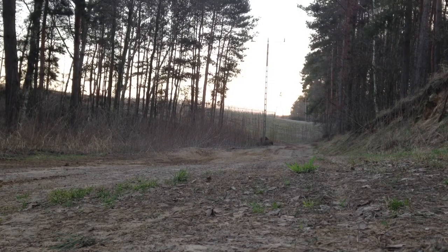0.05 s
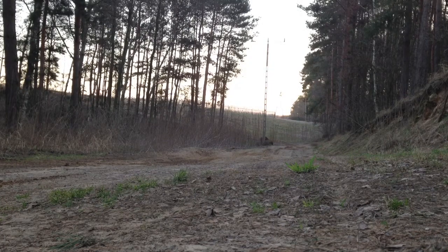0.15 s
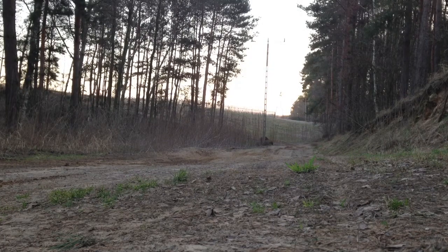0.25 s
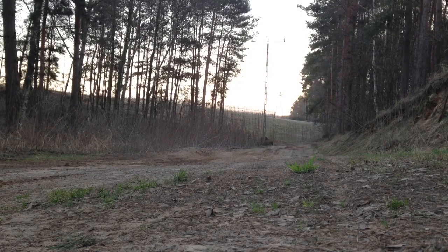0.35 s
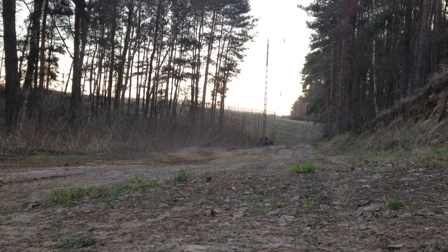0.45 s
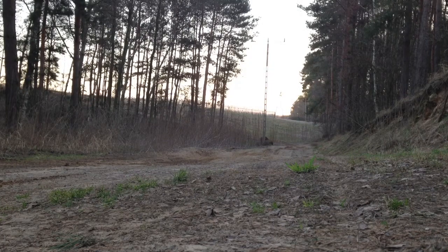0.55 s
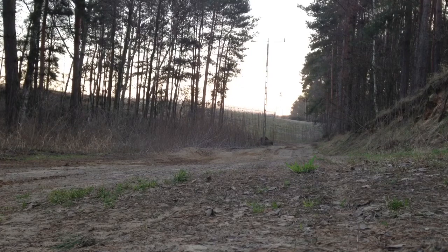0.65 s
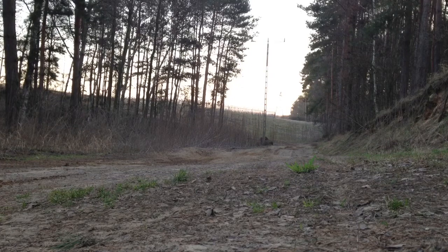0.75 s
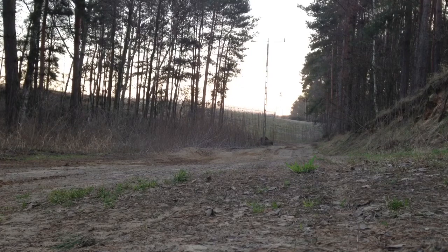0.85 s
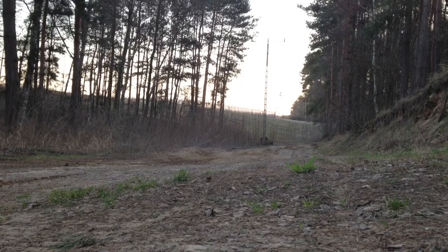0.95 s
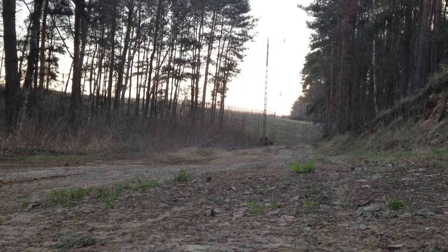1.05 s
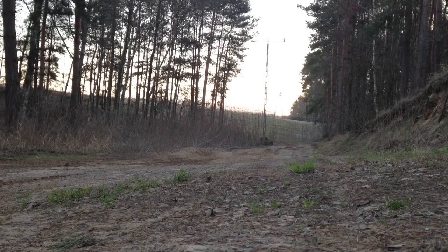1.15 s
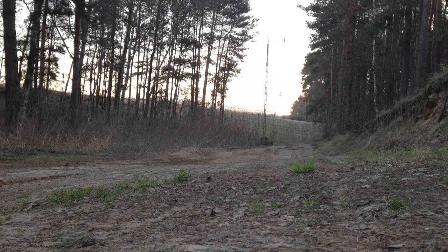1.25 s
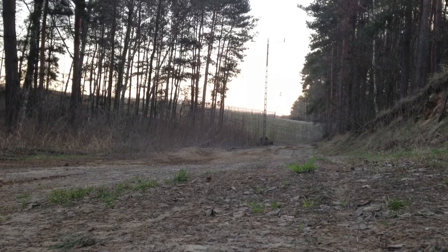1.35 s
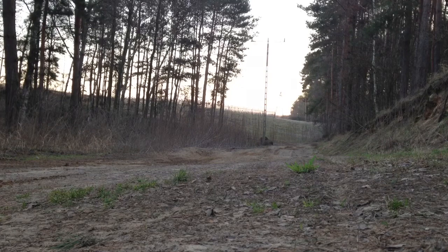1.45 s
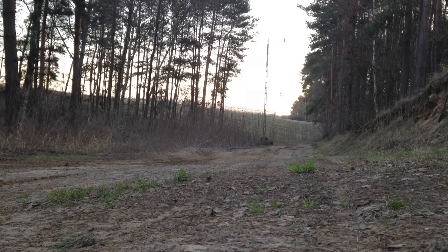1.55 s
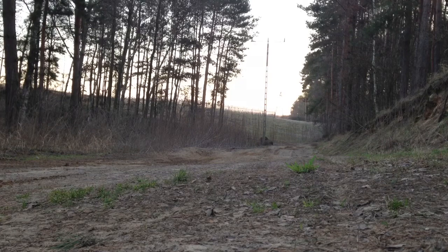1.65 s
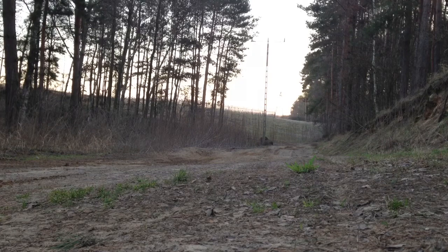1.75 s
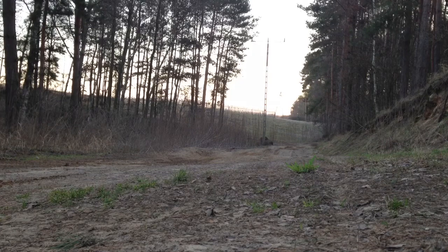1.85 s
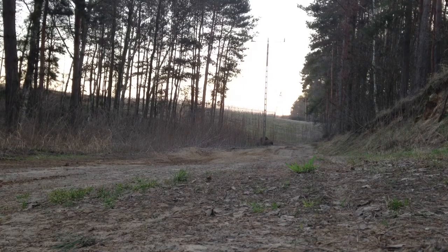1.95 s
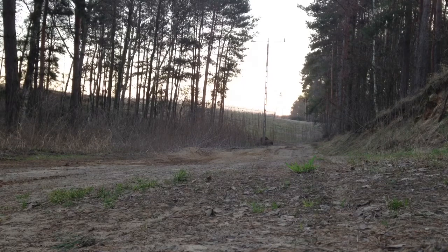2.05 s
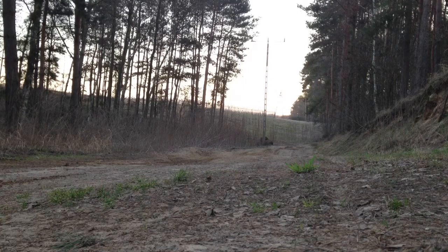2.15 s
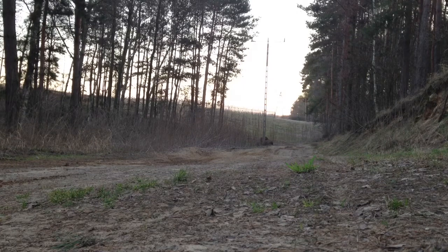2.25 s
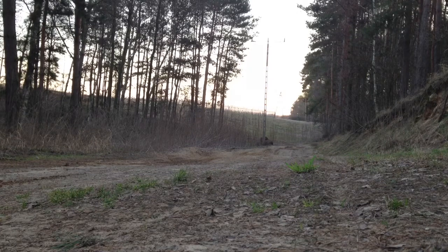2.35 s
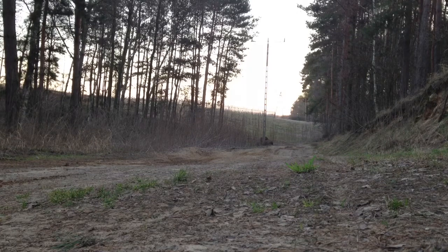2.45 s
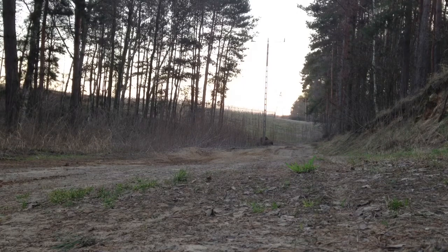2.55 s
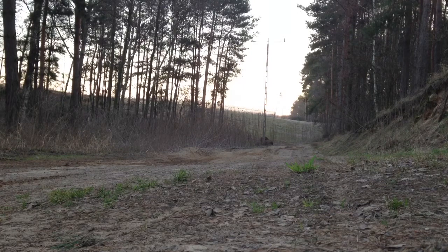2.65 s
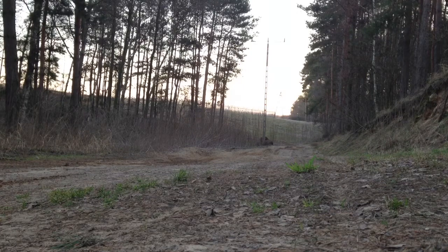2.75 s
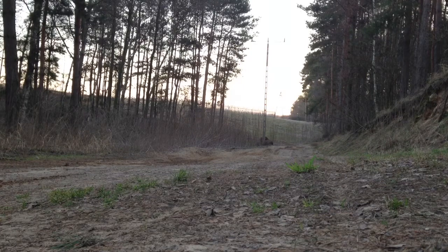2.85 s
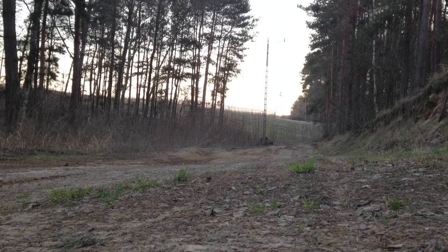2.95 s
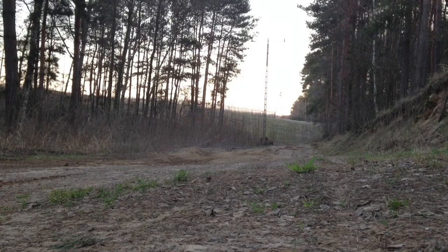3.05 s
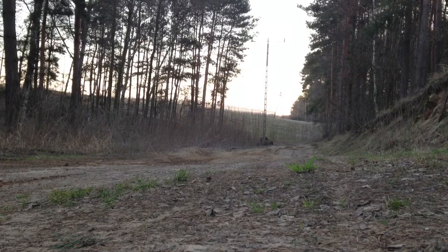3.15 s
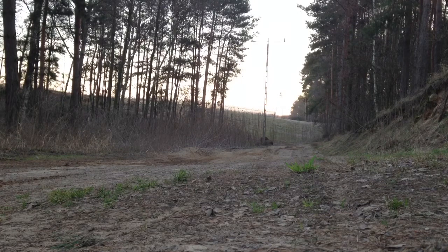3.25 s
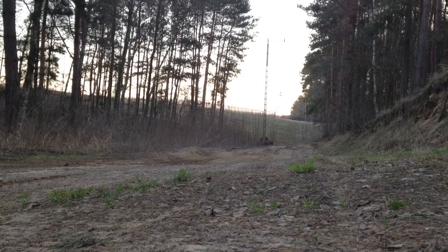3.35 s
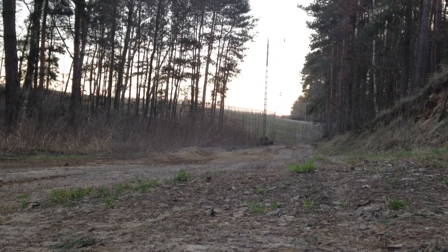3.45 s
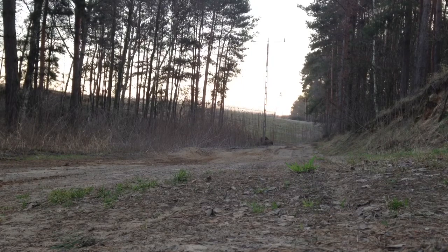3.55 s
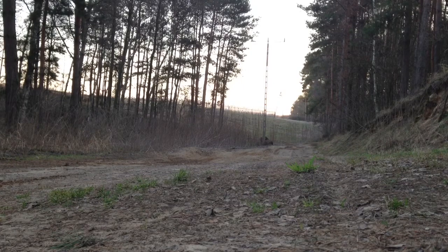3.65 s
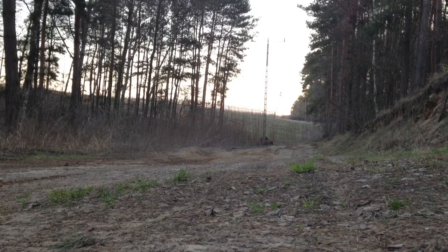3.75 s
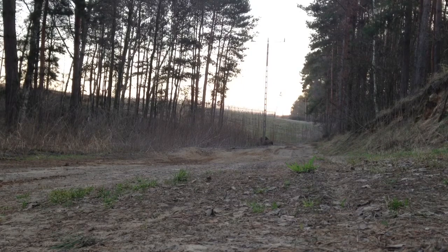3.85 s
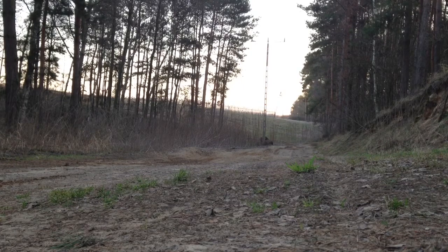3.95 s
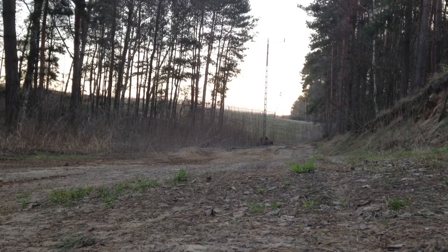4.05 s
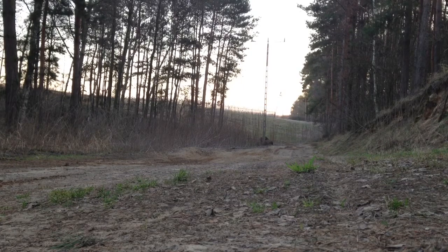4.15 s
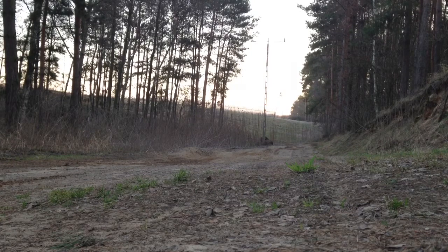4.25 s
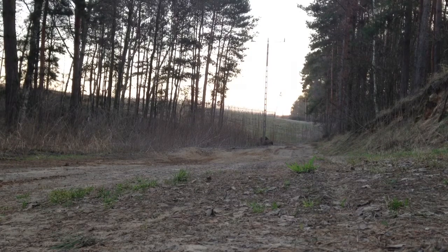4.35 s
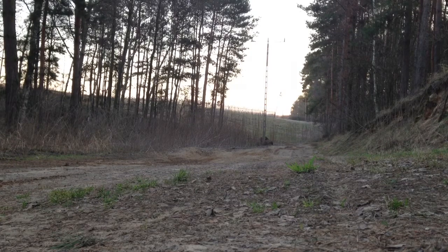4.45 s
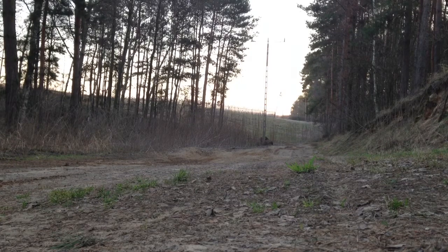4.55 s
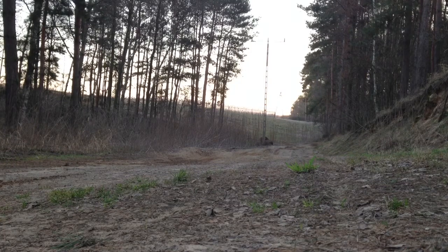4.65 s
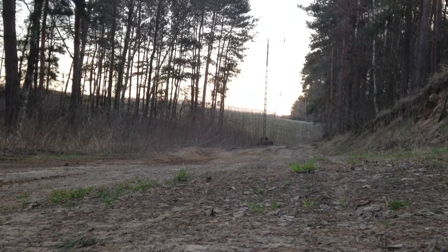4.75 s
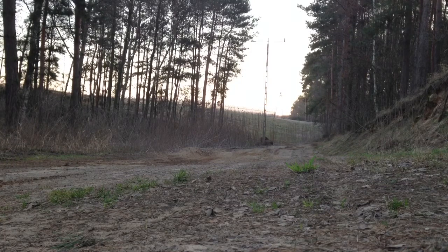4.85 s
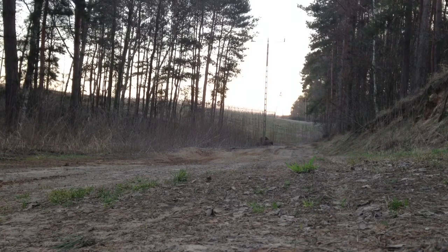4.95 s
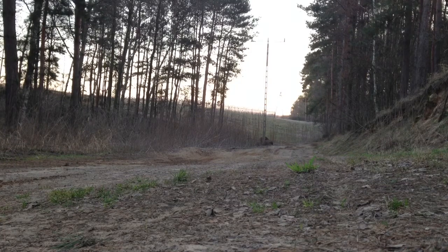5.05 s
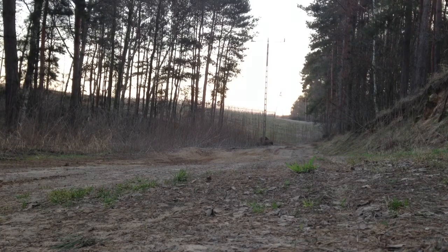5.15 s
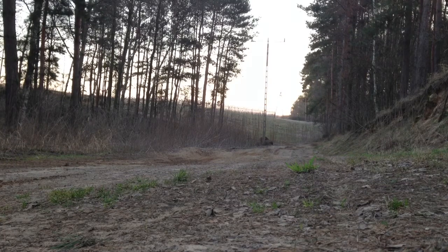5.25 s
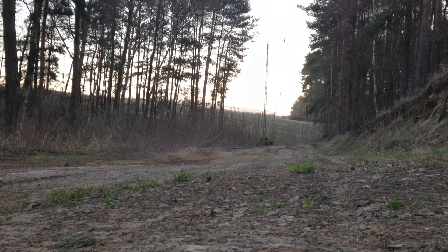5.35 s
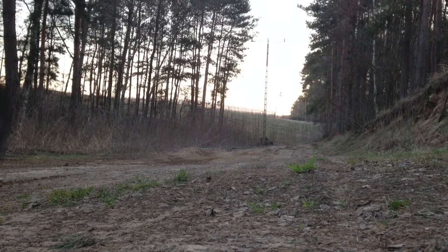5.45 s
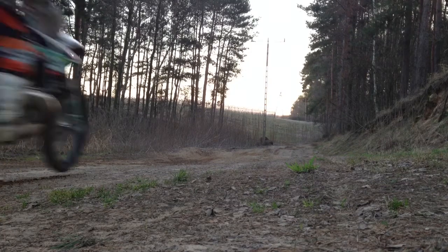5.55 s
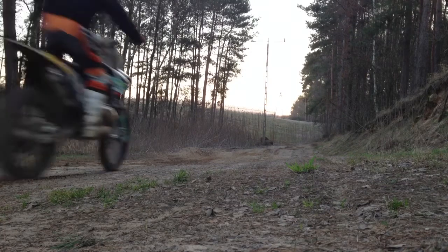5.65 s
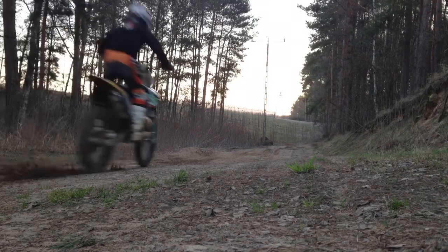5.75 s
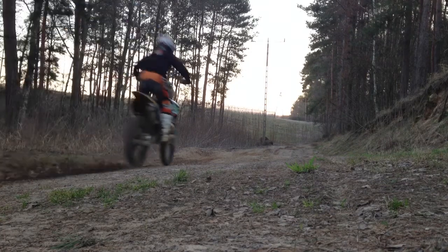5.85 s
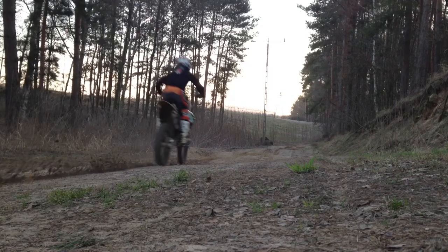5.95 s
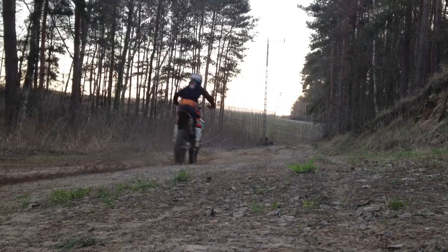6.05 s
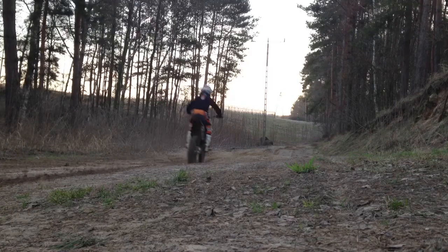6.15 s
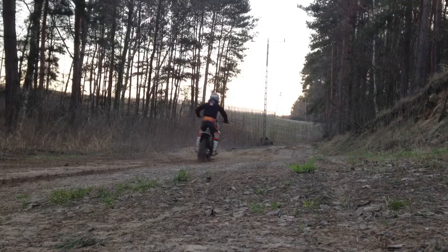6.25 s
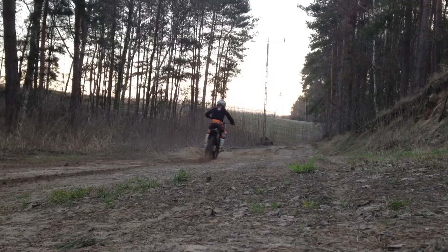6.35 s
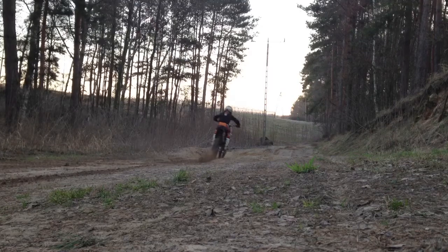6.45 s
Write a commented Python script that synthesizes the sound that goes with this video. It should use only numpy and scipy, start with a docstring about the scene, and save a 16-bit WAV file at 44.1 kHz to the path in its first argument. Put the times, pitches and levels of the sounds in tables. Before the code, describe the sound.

Distant puttering and throttle blips swell into the loud, raspy close pass of a two-stroke dirt bike on a gravelly forest track.

```python
"""A two-stroke dirt bike putters and blips far down a forest track, then revs up, passes close to one
fixed microphone at about 5.4 s and rides away. It fires once per crank turn: the exhaust sounds the
harmonics (orders) of that rate, the cylinder fins and header pipe ring with each firing, and heavy
firings pop in the silencer. The tyres throw gravel, and the trunks send back a short dull echo
over the faint air of the forest."""
import sys
import numpy as np
from scipy import signal
from scipy.fft import irfft
from scipy.io import wavfile
from scipy.ndimage import uniform_filter1d

SR = 44100
rng = np.random.default_rng(int(sys.argv[2]) if len(sys.argv) > 2 else 0)


def put_to_file(sound):
    """Save the sound as 16-bit audio at rate SR, in the file named by the first command-line argument."""
    columns = np.atleast_2d(sound).T  # one column per channel
    safe = np.clip(columns, -1, 1)
    whole_steps = np.round(safe * 32767)
    wavfile.write(sys.argv[1], SR, whole_steps.astype(np.int16))


N = 286324

NEAR_S, NEARING_S = 4.43, .086   # the bike comes clear of the trees
PASS_S, TURN_S = 5.37, .015      # the microphone now hears it from behind
IDLE_HZ, MID_HZ = 40, 100        # reference firing rates
FADING_DB = 2.0                  # spread of the slow fading of upper orders and metal rings

# Fin ring and tail-pipe rasp against the engine noise: time_s, fins_db, rasp_db
FINS_AND_RASP = [(0, -4, -1), (1.7, -10, 0.5), (1.9, -2, -4), (2.3, -12, -11), (3.1, -7, -8), (3.3, -4, -8),
                 (3.48, 1.5, -19.5), (3.62, 2.5, -4), (3.7, 2, 2.5), (4.15, 3.5, -12), (4.23, 4, 7),
                 (4.4, 0, 0), (4.54, 5, 2.5), (4.62, -9, 5.5), (4.74, -1, 0), (4.86, 0.5, -0.5),
                 (5.0, 4, 3.5), (5.15, 1, -6.5), (5.3, -13, -2), (5.42, -11, -1), (5.55, -8, 8.5),
                 (5.85, -7, 9), (6.06, -6, 5), (6.2, -8, 7), (6.275, -2.5, 8.5), (6.33, -1, 3),
                 (6.49, -3.5, 9)]
# Treble at open throttle: time_s, gravel_db, sizzle_db
TREBLE_LEVELS = [(0, -77, -86), (.8, -74.5, -85), (1.7, -69.5, -84), (2.5, -69.5, -81), (3.0, -62, -79),
                 (3.25, -63, -70), (3.6, -58, -65), (4.2, -53.5, -58), (4.55, -51.5, -53), (4.85, -44, -50),
                 (5.03, -19, -36), (5.08, -22.5, -32), (5.11, -28.5, -38), (5.18, -22, -26),
                 (5.21, -23.5, -24), (5.33, -18, -21), (5.45, -20.5, -23), (5.64, -27.5, -22.5),
                 (5.86, -38.5, -30), (6.06, -42.5, -32.5), (6.3, -49, -42), (6.49, -45, -39.5)]


def low_orders(tone_db, firing_hz, opened):
    """Levels in dB of exhaust orders 1-4, coloured by where the bike is; they fade most at low revs."""
    # Exhaust colour far off among the trees: pitch_hz, gain_db
    far_colour = [(85, -23), (105, -8), (130, -5), (160, -6), (200, 0.5), (240, -1), (272, -17),
                  (310, -7.5), (350, -8), (400, -23), (440, -18)]
    # Close by, facing the microphone: pitch_hz, gain_db
    front_colour = [(160, -4.5), (200, 2), (270, -3.5), (300, -19), (340, -16.5), (400, -11), (450, -13),
                    (800, -10.5)]
    # Riding away: pitch_hz, gain_db
    rear_colour = [(120, -20), (165, -6.5), (260, -1.5), (340, 0), (490, -9.5), (660, -5.5), (780, -34)]
    # The first order needs revs to sound: firing_hz, gain_db
    first_order = [(45, -43), (100, -20.5), (125, -4), (150, 0.5)]
    near, behind = crossfade(NEAR_S, NEARING_S), crossfade(PASS_S, TURN_S)
    tone_db = tone_db + (-19 + 5 * behind) * (1 - opened)   # a shut throttle costs less from behind
    levels = []
    for k in range(1, 5):
        hz = k * firing_hz
        ahead = near * at_hz(front_colour, hz) + (1 - near) * at_hz(far_colour, hz)
        colour = (1 - behind) * ahead + behind * at_hz(rear_colour, hz)
        fading = 1.42 * MID_HZ / firing_hz * drift(4.7)
        levels.append(tone_db + colour + (k == 1) * at_hz(first_order, hz) + fading)
    return levels


def exhaust(turns, firing_hz, low_db, boom_db, rasp_db):
    """Twenty orders of the firing rate: four low ones, then silencer boom and tail-pipe rasp."""
    # Silencer colour: pitch_hz, gain_db
    boom_colour = [(150, 31), (230, 9), (320, 2), (400, -10.5), (520, -41), (800, -61)]
    # Tail-pipe colour: pitch_hz, gain_db
    rasp_colour = [(350, -1), (600, -16), (673, -8), (846, -12.5), (1150, -11), (1820, -21.5), (2020, -19),
                   (3000, -21), (3900, -65), (6600, -120)]
    out, coarse = np.zeros(N), np.arange(0, N, 64)
    for k in range(1, 21):
        if k <= 4:
            gain = amp(low_db[k - 1][coarse])
        else:
            hz = k * firing_hz[coarse]
            boom = amp(boom_db[coarse] + at_hz(boom_colour, hz))
            rasp = amp(rasp_db[coarse] + at_hz(rasp_colour, hz))
            gain = (boom + rasp) * amp(FADING_DB * drift(9.3, step=64))   # ground and trunk echoes
        lag_rad = .2946 * k * (k + 1) / 2   # the pipe smears the pulse: high orders come late
        scatter_rad = .9 * IDLE_HZ / firing_hz[coarse] * drift(3.1, step=64)   # trunk echoes
        phasor = np.interp(np.arange(N), coarse, gain * np.exp(1j * (scatter_rad - lag_rad)))
        out += np.sqrt(2) * (phasor * np.exp(2j * np.pi * k * turns)).real
    return out


def throttle(shut_s):
    """How far open the throttle is (0-1), and the push in dB of the latest opening, scaled by that."""
    # Twists of the grip: open_s, shut_s, push_db
    twists = [(0.021, 0.155, -2), (0.246, 0.28, -12), (0.483, 0.502, -6.5), (0.562, 1.087, -2.5),
              (1.233, 1.32, -1.5), (1.424, 1.514, 0), (1.625, 2.036, -1.5), (2.197, 3.73, 0.5),
              (3.87, 3.901, 4), (4.059, 4.222, -1.5), (4.347, 5.885, -0.5), (6.032, 6.056, 1.5),
              (6.248, 6.699, -1.5)]
    t, opened, rise_s = np.arange(N) / SR, np.zeros(N), .02
    for start, end, _ in twists:
        end = max(end, start + rise_s)
        opened = np.maximum(opened, np.interp(t, [start, start + rise_s, end, end + shut_s], [0, 1, 1, 0]))
    starts, _, push_db = np.transpose(twists)
    latest = np.maximum(np.searchsorted(starts, t) - 1, 0)
    return opened, opened * push_db[latest]


def crank(firing_hz):
    """Crank turns so far; they run a little fast or slow, least at high revs."""
    wobble = .008 * (IDLE_HZ / firing_hz) ** 2 * drift(24.1)
    return np.cumsum(firing_hz * (1 + wobble)) / SR


def firing_strength(turns, firing_hz):
    """Each firing burns with its own strength, more evenly at high revs; at times the level dips."""
    # Brief dips (misfires, lulls around a throttle blip): centre_s, half_length_s, depth_db (sign ignored)
    dips = [(3.86, 0.011, -4), (3.943, 0.013, -4), (4.045, 0.011, 2), (4.096, 0.025, -8),
            (4.128, 0.004, -9), (4.161, 0.0058, -10), (4.36, 0.005, -2), (4.381, 0.0043, -10),
            (4.255, 0.024, -0.5)]
    t, whole = np.arange(N) / SR, np.arange(int(turns[-1]) + 2)
    chance = np.interp(turns, whole, rng.standard_normal(2000)[whole])
    db = 2.7 * IDLE_HZ / firing_hz * chance
    for centre_s, half_s, depth_db in dips:
        db -= abs(depth_db) * np.exp(-((t - centre_s) / half_s) ** 4)
    return amp(db)


def shaking(turns, firing_hz):
    """Two noises that shake the engine; a share is tied to the crank angle and returns every turn."""
    # Repeating part of the noise power: time_s, share (0-1)
    repeating = [(0, .3), (3.0, .3), (4.4, .3), (4.65, .55), (4.85, .45), (5.0, .5), (5.35, .4),
                 (5.55, .55), (5.72, .65), (5.9, .65), (6.0, .45), (6.49, .45)]
    orders = np.zeros(2049, complex)
    orders[5:110] = np.exp(2j * np.pi * rng.random(105))
    cycle = rms_one(irfft(orders))
    tied = np.interp(turns % 1, np.arange(len(cycle)) / len(cycle), cycle)
    tied *= np.sqrt(210 * firing_hz / SR)   # same power per Hz as the white noise
    share, = in_time(repeating)
    return np.sqrt(share) * tied * [[1], [-1]] + np.sqrt(1 - share) * rng.standard_normal((2, N))


def bursts(turns, depth, fall):
    """Envelope that jumps at each firing and sinks until the next."""
    return 1 - depth + depth * 3 * np.exp(-fall * (turns % 1))


def ringing(turns, shake, modes):
    """Each firing shakes the metal, whose resonances ring and fade in turn."""
    drive = shake * bursts(turns, depth=.38, fall=5.7)
    out = 0
    for hz, width_hz, db in modes:
        ring = resonance(resonance(drive, hz, width_hz), hz, 2 * width_hz)
        out += amp(db + FADING_DB * drift(4.0)) * ring
    return rms_one(out)


def cylinder_fins(turns, shake, noise_db, opened):
    """The cooling fins clatter with each firing, hardest on an open throttle."""
    # Cylinder resonances: pitch_hz, width_hz, level_db
    modes = [(1356, 132, 5), (1556, 165, 1), (1786, 144, -0.5)]
    level_db = noise_db + in_time(FINS_AND_RASP)[0] - 5 - 12.5 * (1 - opened)
    return amp(level_db) * ringing(turns, shake, modes)


def header_pipe(turns, shake, noise_db, opened):
    """The header pipe rings with each firing, higher than the fins."""
    # Pipe resonances: pitch_hz, width_hz, level_db
    modes = [(2466, 110, 0.5), (2715, 128, 2.5), (3390, 450, -6)]
    # Its ring against the engine noise: time_s, level_db
    prominence = [(0, -11), (.6, -7), (1.1, -10), (1.3, -2.5), (1.55, -4), (1.8, -6.5), (2.5, -4.5),
                  (3.1, -8.5), (3.6, -6), (3.72, -9), (4.22, -5.5), (4.5, -8.5), (4.8, -16), (5.14, -12),
                  (5.3, -26), (5.42, -8), (5.5, -14), (5.64, -6.5), (5.85, -10), (6.2, -9), (6.49, -11.5)]
    level_db = noise_db + in_time(prominence)[0] - 1.5 - 4.5 * (1 - opened)
    return amp(level_db) * ringing(turns, shake, modes)


def thin_rasp(turns, noise_db, opened):
    """A narrow band at 4.4 kHz that comes up once the tail pipe points back at the microphone."""
    level_db = noise_db + facing_db(ahead_db=-40, behind_db=-17, turn_s=5.97) - 14 * (1 - opened)
    return amp(level_db) * ringing(turns, rng.standard_normal(N), [(4400, 1000, 0)])


def roar(turns, firing_hz, shake, noise_db, opened):
    """Broad noise of combustion, chain and tyres, pulsing with the firings and duller from behind."""
    # Colour of the roar: pitch_hz, density_db
    colour = [(53, -57), (90, -26), (188, -11), (319, -11.5), (560, -11.5), (691, -10), (1090, -8.5),
              (1320, -10.5), (1780, -10), (2170, -8), (6000, -42), (7800, -66), (13200, -120)]
    # Rider and frame shade the treble after the pass: time_s, share (0-1)
    shade = [(0, 0), (5.42, 0), (5.68, .7), (5.9, .8), (6.25, .85), (6.49, .85)]
    bright = banded(shake * bursts(turns, depth=.16, fall=.57), colour, flicker_db=2)
    dull = butter(bright, 1100, "low", order=1)
    level_db = noise_db + facing_db(ahead_db=-3.5, behind_db=-4, turn_s=5.4)
    level_db += revs_db(firing_hz) - 6.5 * (1 - opened)
    return amp(level_db) * (bright + in_time(shade)[0] * (dull - bright))


def sizzle(turns, opened):
    """Thin top of the exhaust jet, puffing with each firing."""
    jet = rng.standard_normal(N) * bursts(turns, depth=.21, fall=2.4)
    level_db = in_time(TREBLE_LEVELS)[1] - 2.5 - 15 * (1 - opened)
    return amp(level_db) * rms_one(butter(jet, 9500, "high"))


def silencer_pops():
    """Heavy firings ring briefly in the silencer."""
    # Pops: start_s, level_db, pitch_hz
    pops = [(0.018, -44, 159), (0.058, -22, 187), (1.254, -20, 284.5), (1.297, -22, 290), (1.437, -22, 213),
            (1.666, -21.5, 300), (3.875, -2.5, 191.9), (4.058, -5, 180), (4.105, -2.5, 193),
            (4.137, -6, 193.4), (4.171, -4, 201), (4.369, 0, 220), (4.39, -24, 186), (6.044, -6, 288),
            (6.265, -5, 278.5)]
    out, length = np.zeros(N), 4000
    for start_s, db, hz in pops:
        click = amp(db + 26.5) * signal.unit_impulse(length)
        out[round(start_s * SR):][:length] += resonance(resonance(click, hz, 52), hz, 190)
    return butter(out, 150, "high")


def stone_ticks():
    """Stones and metal tick: a crack with a short ring."""
    # Ticks: start_s, level_db, pitch_hz, width_hz, t60_s
    ticks = [(1.739, -39, 1100, 1500, .06), (2.949, -48, 8000, 6000, .015), (4.347, -22, 3200, 1800, .022),
             (5.402, -6, 2760, 90, .12)]
    out, t = np.zeros(N), np.arange(4000) / SR
    for start_s, db, hz, width_hz, t60_s in ticks:
        crack = amp(db - 60 * t / t60_s) * rng.standard_normal(len(t))
        ring = resonance(resonance(crack, hz, width_hz), hz, 2 * width_hz)
        out[round(start_s * SR):][:len(t)] += ring * np.sqrt(5000 / width_hz)
    return out


def gravel(turns, opened, grains_per_s=2500):
    """Dense grains thrown by the tyres, on a hiss that throbs with the intake."""
    # Colour of grains and hiss: pitch_hz, density_db
    colour = [(1470, -7), (2500, -12.5), (3010, -4), (3550, -5), (4140, -8.5), (6600, -2), (14700, -19),
              (15600, -20), (16000, -46)]
    hits = rng.random((2, N)) < grains_per_s / SR
    grains = hits * amp(1.5 * rng.exponential(1, (2, N))) * rng.choice([-1, 1], (2, N))
    intake = rng.standard_normal((2, N)) * (1 + .043 * np.cos(2 * np.pi * turns))
    level_db = in_time(TREBLE_LEVELS)[0] - 6 * (1 - opened)
    return amp(level_db) * banded(intake + 4.4 * grains, colour, flicker_db=2)


def rumble():
    """Lumpy low noise, strongest as the bike comes close."""
    # Rumble at the microphone: time_s, level_db
    levels = [(0.0, -85), (0.89, -95), (2.87, -74), (4.21, -71), (4.22, -59), (4.45, -81), (4.72, -54),
              (4.79, -70), (4.99, -43), (5.26, -51), (5.29, -68), (5.61, -56), (5.72, -77), (6.4, -82)]
    low = butter(rng.standard_normal(N), [25, 75], "band")
    return amp(in_time(levels)[0]) * rms_one(low * amp(2.3 * drift(10)))


def trees(engine, t60_s=.33):
    """The trunks scatter a dull, dying echo, 3 dB stronger against the engine while it is far off."""
    t = np.arange(int(.8 * SR)) / SR
    tail = rng.standard_normal(len(t)) * amp(-60 * t / t60_s) * (t > .02)
    tail = butter(tail, [170, 5150], "band")
    echo_db = -13.5 - 3 * crossfade(NEAR_S, NEARING_S)
    return signal.fftconvolve(engine * amp(echo_db), tail / np.sqrt(np.sum(tail ** 2)))[:N]


def forest_air():
    """Faint, gently flickering hush of the still forest."""
    # Colour of the hush: pitch_hz, density_db
    colour = [(240, -31), (400, -3.5), (467, -8), (1270, -7.5), (4580, -17.5), (14600, -24), (15300, -21),
              (16000, -42)]
    return amp(-63.5) * banded(rng.standard_normal((2, N)), colour, flicker_db=2.5)


def facing_db(ahead_db, behind_db, turn_s):
    """Level of a part that shows the microphone its front, then its back."""
    return ahead_db + (behind_db - ahead_db) * crossfade(turn_s, TURN_S)


def revs_db(firing_hz):
    """1.5 dB louder for each doubling of the revs."""
    return 1.5 * np.log2(firing_hz / MID_HZ)


def crossfade(centre_s, within_s):
    """Smooth step from 0 to 1."""
    return .5 + .5 * np.tanh((np.arange(N) / SR - centre_s) / within_s)


def amp(db):
    """Gain of a level in dB."""
    return 10 ** (np.asarray(db) / 20)


def rms_one(x):
    """Scaled to rms 1."""
    return x / np.sqrt(np.mean(x ** 2) + 1e-20)


def in_time(rows):
    """The columns of a curve table, one value a sample."""
    times, *columns = np.transpose(rows)
    return [np.interp(np.arange(N) / SR, times, column) for column in columns]


def at_hz(spectrum, hz):
    """A spectrum read on a log-frequency axis."""
    pitches, db = np.transpose(spectrum)
    return np.interp(np.log(hz), np.log(pitches), db)


def drift(rate_hz, step=1):
    """Slow random wander of spread 1, read at every step-th sample."""
    r = np.exp(-80 * np.pi * rate_hz / SR)
    slow = signal.lfilter([1], [1, -2 * r, r * r], rng.standard_normal(N // 40 + 2002))[2000:]
    return np.interp(np.arange(0, N, step) / 40, np.arange(len(slow)), rms_one(slow))


def butter(x, hz, kind, order=2):
    """Low-, high- or band-pass filter."""
    return signal.sosfilt(signal.butter(order, hz, kind, fs=SR, output="sos"), x)


def resonance(x, hz, width_hz):
    """Two-pole peak of gain 1."""
    r = np.exp(-np.pi * width_hz / SR)
    feedback = [1, -2 * r * np.cos(2 * np.pi * hz / SR), r * r]
    return signal.lfilter(np.array([1, 0, -1]) * (1 - r * r) / 2, feedback, x + 1e-18)


def banded(noises, spectrum, flicker_db):
    """Half-octave bands cut from two noises in turn, each with its own level and flicker; rms 1."""
    low_hz, top_hz = spectrum[0][0], spectrum[-1][0]
    octaves = np.arange(0, np.log2(top_hz / low_hz) + .5, .5)
    edges = np.minimum(low_hz * 2 ** octaves, .45 * SR)
    out = 0
    for k, (low, high) in enumerate(zip(edges, edges[1:])):
        level_db = at_hz(spectrum, np.sqrt(low * high)) + flicker_db * drift(14.9)
        out += amp(level_db) * butter(noises[k % 2], [low, high], "band")
    return rms_one(out)


def scene():
    """The bike, its echo and the forest air, heard from the side of the track."""
    # Engine speed as heard at the microphone: time_s, firing_hz
    revs = [(0, 42.6), (.14, 59), (.38, 38), (.5, 52), (.59, 42), (.69, 52), (.81, 48), (.89, 55.6),
            (1.0, 50), (1.1, 47), (1.26, 38.2), (1.5, 43.3), (1.6, 36.6), (1.68, 46), (1.78, 50),
            (1.85, 53.5), (2.02, 53), (2.18, 46.4), (2.23, 51.4), (2.32, 43), (2.45, 41.5), (2.61, 49),
            (2.7, 50.7), (2.83, 59.3), (2.96, 64.6), (3.05, 72), (3.21, 70.6), (3.38, 90.4), (3.47, 83.3),
            (3.52, 90), (3.59, 100), (3.64, 103), (3.72, 110), (3.76, 94), (3.85, 97), (4.0, 90.6),
            (4.08, 91.6), (4.25, 106), (4.34, 99), (4.41, 84.7), (4.61, 107.7), (4.72, 109), (4.824, 92.5),
            (4.9, 108), (5.0, 152), (5.044, 193), (5.125, 128.6), (5.232, 187), (5.25, 207), (5.336, 148),
            (5.41, 156), (5.484, 180.6), (5.512, 193), (5.56, 153), (5.624, 151), (5.716, 166.5),
            (5.858, 163), (5.952, 156), (6.01, 149), (6.086, 141.4), (6.236, 123.3), (6.328, 172),
            (6.366, 163), (6.422, 152), (6.49, 175.5)]
    # Exhaust tone at open throttle, as the bike nears and leaves: time_s, level_db
    tone_levels = [(0, -47.5), (.7, -47.5), (1.1, -51), (2.0, -48.5), (2.3, -53.5), (2.7, -51),
                   (2.88, -48.5), (3.02, -49.5), (3.06, -43), (3.25, -45.5), (3.5, -30.5), (3.6, -36),
                   (3.72, -36.5), (4.2, -30), (4.55, -26.5), (4.73, -16), (4.9, -19.5), (4.98, -15),
                   (5.05, -12.5), (5.11, -18), (5.18, -13.5), (5.25, -16.5), (5.33, -22.5), (5.46, -12.5),
                   (5.56, -13), (5.85, -14.5), (6.05, -20.5), (6.28, -17.5), (6.35, -23.5), (6.49, -15)]
    # Engine noise at open throttle: time_s, level_db
    noise_levels = [(0, -57), (.65, -62.5), (1.0, -59.5), (1.65, -60), (1.78, -55), (2.5, -57), (2.95, -51),
                    (3.2, -47), (3.5, -42), (3.7, -40), (4.2, -35.5), (4.45, -34), (4.62, -26.5),
                    (4.73, -21), (4.79, -26.5), (4.98, -10.5), (5.06, -17.5), (5.11, -17), (5.16, -11),
                    (5.24, -16.5), (5.42, -12.5), (5.47, -16), (5.52, -15), (5.72, -16), (5.88, -19.5),
                    (6.06, -22.5), (6.3, -24), (6.49, -23.5)]
    firing_hz = uniform_filter1d(in_time(revs)[0], size=900)   # the flywheel rounds off speed changes
    opened, push_db = throttle(shut_s=.05)
    noise_open, _ = throttle(shut_s=.1)   # noise dies down more slowly than tone
    tone_db = in_time(tone_levels)[0] + push_db
    noise_db = in_time(noise_levels)[0] + .5 * push_db
    low_db = low_orders(tone_db, firing_hz, opened)
    boom_db = tone_db + facing_db(ahead_db=-15.5, behind_db=-15, turn_s=5.38)
    boom_db += revs_db(firing_hz) - 12 * (1 - opened)
    rasp_db = noise_db + in_time(FINS_AND_RASP)[1] - 10 - 15 * (1 - opened)

    turns = crank(firing_hz)
    strength, shake = firing_strength(turns, firing_hz), shaking(turns, firing_hz)
    fired = exhaust(turns, firing_hz, low_db, boom_db, rasp_db)
    fired += cylinder_fins(turns, shake[0], noise_db, opened)
    fired += header_pipe(turns, shake[0], noise_db, noise_open)
    fired += thin_rasp(turns, noise_db, noise_open)
    rush = roar(turns, firing_hz, shake, noise_db, noise_open) + sizzle(turns, noise_open)
    engine = strength * fired + np.sqrt(strength) * rush   # roar and sizzle dip only half as deep in dB
    engine += silencer_pops() + stone_ticks()
    return (engine + forest_air() + gravel(turns, noise_open) + rumble() + trees(engine))[None]


def record(dry):
    """The microphone rounds the peaks, rolls off the deepest bass and cuts the very top."""
    rounded = butter(.95 * np.tanh(dry / .95), 30, "high")
    return signal.sosfilt(signal.cheby2(16, 90, 16200, fs=SR, output="sos"), rounded)


dry = scene()
out = record(dry)
put_to_file(out)
```